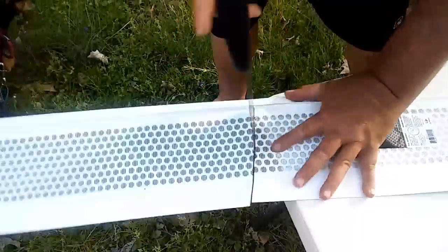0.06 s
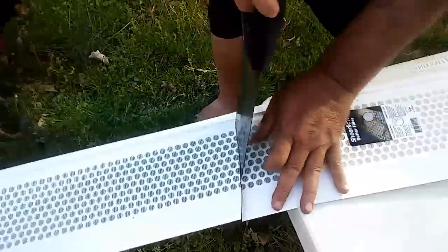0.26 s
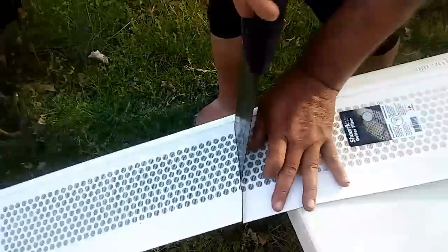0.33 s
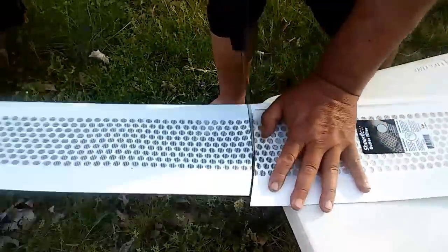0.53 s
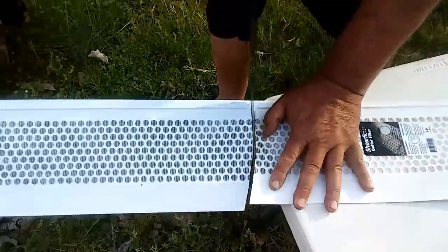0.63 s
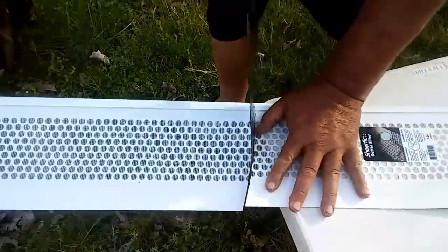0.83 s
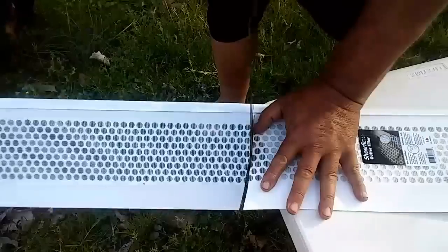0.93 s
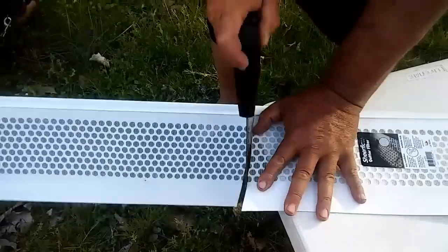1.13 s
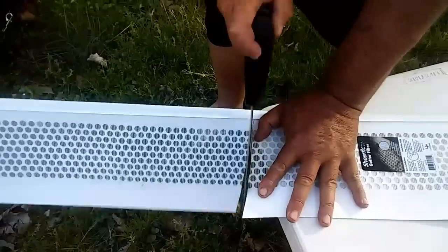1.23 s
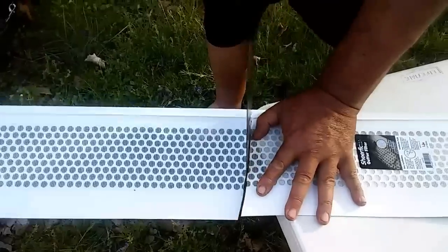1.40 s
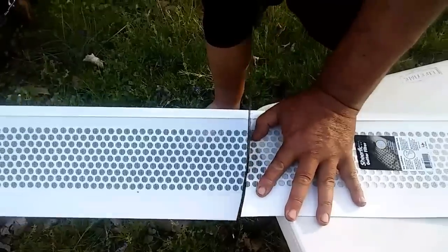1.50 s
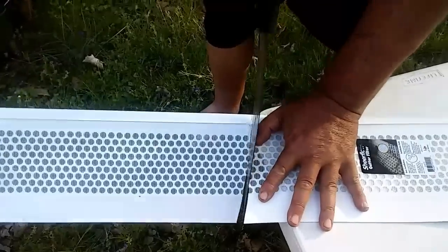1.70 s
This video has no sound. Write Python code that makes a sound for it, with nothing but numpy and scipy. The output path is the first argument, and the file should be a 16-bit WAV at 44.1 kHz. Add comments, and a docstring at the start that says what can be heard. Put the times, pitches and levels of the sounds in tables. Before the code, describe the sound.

A hand saw bites unevenly through a thin plastic panel, close up in faint outdoor air. The first push grows from near silence at 0.1 s, with low flutter, hollow clacks and a brief singing rub near 0.24. The pull from 0.55 to 1.0 cracks, thumps and squeals. The loudest push, 1.12 to 1.5, rumbles and slaps, then fades before a hollow knock near 1.68.

```python
"""A hand saw makes three strokes through a thin perforated plastic panel, in faint outdoor air.
From the start, uneven tooth bites drive a low flutter, a hollow clack and a bright blade rasp; the handle judders.
Teeth soon snap free as bursts of decaying noise over ringing steel; handle knocks and soft panel thumps join.
Then the blade rubs with a singing hiss, and short gliding tones give a scrape, a tear and later blade squeals.
A deep noise rumble is faint in the pull and swells in the hard last push, where the loose panel slaps
in noise bursts. The close microphone rounds the peaks."""
import sys
import numpy as np
from scipy import signal
from scipy.fft import rfft, irfft
from scipy.io import wavfile
from scipy.ndimage import uniform_filter1d

SR = 44100
rng = np.random.default_rng(int(sys.argv[2]) if len(sys.argv) > 2 else 0)


def dump_mix(stems):
    """Bounce the given channels to the path in sys.argv[1] as a 16-bit WAV at rate SR."""
    frames = np.atleast_2d(stems).T  # one column per channel
    limited = np.clip(frames, -1, 1)  # hard clip at full scale
    pcm = np.round(limited * 32767).astype(np.int16)
    wavfile.write(sys.argv[1], SR, pcm)


N = 77175  # length in samples


def undb(db):
    """Decibels to gain."""
    return 10 ** (np.asarray(db) / 20)


def unit(x):
    """Scale to rms 1."""
    return x / np.sqrt(np.mean(x ** 2) + 1e-18)


def curve(rows, axis):
    """One column of a table, joined by straight lines in time."""
    rows = np.array(rows, float)
    return np.interp(np.arange(N) / SR, rows[:, 0], rows[:, axis])


def colour(x, points):
    """Causal minimum-phase filter drawn through (f/Hz, level/dB) points."""
    size = 4096
    hz, db = np.array(points, float).T
    bins_hz = np.arange(size // 2 + 1) * SR / size
    gain_db = np.interp(np.log(bins_hz + 1), np.log(hz), db)
    # Folding the cepstrum forward in time puts the energy as early as possible.
    cepstrum = irfft(np.log(undb(gain_db)))
    cepstrum[1:size // 2] *= 2
    cepstrum[size // 2 + 1:] = 0
    impulse = irfft(np.exp(rfft(cepstrum)))
    return signal.fftconvolve(x, impulse)[:len(x)]


def walk(rate_hz):
    """Smooth random motion with spread 1: noise averaged twice over 1 / rate_hz."""
    span = max(int(SR / rate_hz), 1)
    noise = rng.standard_normal(N)
    return unit(uniform_filter1d(uniform_filter1d(noise, span), span))


def steady(x):
    """Even out slow changes of strength and keep the grain."""
    span = int(0.041 * SR)  # 41 ms
    power = uniform_filter1d(uniform_filter1d(x ** 2, span), span // 2)
    return x / np.sqrt(power + 1e-12)


def ring(points, t60_s):
    """A blow on a body with many close modes that die away together: coloured, decaying noise."""
    t = np.arange(SR // 4) / SR
    decay = np.exp(-np.log(1000) * t / t60_s)
    return colour(rng.choice([-1., 1.], len(t)) * decay, points)


def modes(table):
    """Separate modes after one blow: decaying sines with alternating signs."""
    t = np.arange(SR // 3) / SR
    tone = 0
    for k, (hz, db, t60_s) in enumerate(table):
        decay = np.exp(-np.log(1000) * t / t60_s)
        tone = tone + (-1) ** k * undb(db) * np.sin(2 * np.pi * hz * t) * decay
    return tone


ATTACK_S = 0.0024  # blow levels are the strongest rms over this stretch


def add(out, start_s, db, blow):
    """Place a blow with its attack at the given level."""
    i = int(start_s * SR)
    blow = blow / np.sqrt(uniform_filter1d(blow ** 2, int(ATTACK_S * SR)).max())
    out[i:i + len(blow)] += undb(db) * blow[:N - i]


def teeth(count):
    """Uneven bites, shared among several contact points, with fine scraping between them."""
    median_rate_hz, jitter = 560, 0.6  # jitter is the spread of the log gap
    scatter_db, deepest = 4, 1.53  # bite size spread, and its upper limit in spreads
    scrape_db = -10.5  # relative to the bites
    gap, size = rng.standard_normal((N // 40, 2)).T
    at = (np.cumsum(np.exp(jitter * gap)) * SR / median_rate_hz).astype(int)
    inside = at < N
    bite_gain = undb(scatter_db * np.minimum(size[inside], deepest))
    bites = np.bincount(at[inside], bite_gain, N)
    point = rng.integers(0, count, N)
    force = unit(bites) + undb(scrape_db) * rng.standard_normal(N)
    return [force * (point == k) for k in range(count)]


# Modes of the steel blade: (f/Hz, relative level/dB, t60/s)
BLADE_MODES = [(4100, 2, 0.038), (4360, -2, .1), (4620, -29, 0.12), (4585, -0.5, .15), (4850, -19, 0.093),
               (5120, 3.5, .1), (5540, 1, 0.11), (5550, 2, 0.099), (6170, -5.5, 0.13), (6370, -3, 0.061),
               (6960, -2.5, 0.093), (8550, -10, 0.075), (9200, -26, .08)]


def blade(force):
    """A force rings the steel blade's own modes, scaled to unit energy per unit kick."""
    tone = modes(BLADE_MODES)
    return signal.fftconvolve(force, tone / np.sqrt(np.sum(tone ** 2)))[:N]


# Strokes of the saw: (t/s, flutter level/dB, clack level/dB, rasp level/dB)
FIRST_PUSH = [(0, -45, -50.5, -62), (.095, -45, -74, -67), (0.126, -33, -42.5, -59),
              (0.204, -29, -31.5, -42), (.24, -32, -33.5, -70), (.305, -34.5, -56, -59),
              (0.344, -34, -37, -30.5), (.36, -33, -46.5, -46), (0.398, -26, -31.5, -38),
              (0.439, -43, -54, -41), (.535, -59, -59, -52)]
PULL = [(0.548, -36, -41, -46), (.58, -35, -24, -44), (.60, -26, -35, -50), (.615, -24.5, -29, -41),
        (.655, -24, -35, -49), (0.682, -27, -27.5, -25.5), (.718, -36, -27, -36), (.73, -28, -17, -23),
        (0.741, -22.5, -20.5, -24.5), (0.754, -26, -26.5, -28.5), (0.776, -29.5, -32, -25),
        (.787, -31.5, -22, -14), (.805, -31, -35, -44), (.845, -22.5, -23.5, -35.5), (.87, -26.5, -28, -31),
        (0.929, -29.5, -34, -52), (1.0, -42.5, -50.5, -58), (1.039, -47, -49, -48.5),
        (1.065, -31, -29.5, -42.5), (1.104, -45, -45.5, -85)]
HARD_PUSH = [(1.126, -27.5, -30, -36), (1.142, -20.5, -27.5, -50), (1.155, -20.5, -26, -42),
             (1.164, -19, -19.5, -20.5), (1.205, -18.5, -14, -22), (1.234, -17, -17.5, -13.5),
             (1.255, -18.5, -18, -24), (1.31, -15.5, -15.5, -20.5), (1.336, -21, -26, -44.5),
             (1.361, -21, -35, -39), (1.417, -29, -29, -32.5), (1.443, -19.5, -27.5, -28.5),
             (1.464, -23.5, -29, -40.5), (1.487, -29.5, -26, -22.5), (1.51, -32, -33, -39),
             (1.55, -32.5, -36, -42.5), (1.60, -42, -44.5, -55), (1.665, -58, -65, -87),
             (1.72, -42, -58, -71), (1.75, -56, -54, -62)]
# Spectra of panel flutter, panel clack and blade rasp: (f/Hz, relative level/dB)
FLUTTER = [(25, -52), (65, -30.5), (90, -39.5), (120, -12.5), (160, -2), (215, -0.5), (280, -2.5),
           (400, -5.5), (630, -9), (820, -14), (1000, -28.5), (2500, -58)]
CLACK = [(300, -28), (700, -19), (960, -9), (1150, -5), (1400, 0), (1650, -1), (2100, -3.5), (2550, -10),
         (3200, -14), (4200, -18.5), (8000, -60)]
RASP = [(1500, -67), (2600, -11.5), (3600, -12), (4500, 0.5), (5500, 0), (6600, -3.5), (7400, -13),
        (8800, -16), (11000, -23), (13000, -35), (16000, -52)]
# Bending modes, then higher hollow modes, of the panel: (f/Hz, relative level/dB, t60/s)
PANEL_MODES = [(106, -9.5, 0.47), (145, -3.5, 0.55), (182.3, 0.5, 0.16), (213.2, 2.5, 0.19),
               (295, -4.5, 0.073), (360, -5, 0.114), (413, -2, 0.11), (460, -2, 0.097), (642, -2.5, 0.13),
               (800, -9.5, 0.13)]
HOLLOW_MODES = [(1160, -3, 0.056), (1344, 3.5, 0.056), (1392, 1, 0.066), (1513, 5, 0.071),
                (1584, -1, 0.051), (1739, -2, 0.12), (1806, -9.5, 0.072), (2020, -5.5, 0.1),
                (2200, -1, .09)]


def sawing():
    """The bites shake panel and blade through three strokes; each contact point rings differently."""
    forces = teeth(count=6)
    strokes = [*FIRST_PUSH, *PULL, *HARD_PUSH]
    push = sum(forces) - np.mean(sum(forces))
    # spectrum, t60/s after one tooth, modes, level of the modes relative to the grain/dB
    bodies = [(FLUTTER, 0.046, PANEL_MODES, 1),
              (CLACK, 0.023, HOLLOW_MODES, -3),
              (RASP, 0.023, BLADE_MODES, -7)]
    out = 0
    for column, (spectrum, t60_s, table, ring_db) in enumerate(bodies, start=1):
        grain = steady(sum(signal.fftconvolve(force, ring(spectrum, t60_s))[:N] for force in forces))
        tone = steady(signal.fftconvolve(push, modes(table))[:N])
        body = steady(grain + undb(ring_db) * tone)
        out = out + body * undb(curve(strokes, axis=column))
    return out


# Spectrum of the outdoor air: (f/Hz, relative level/dB)
AIR = [(25, -33), (80, -28), (180, 7), (500, -22.5), (850, -17), (1500, -18), (6000, -28), (9000, -26),
       (16000, -55)]


def outdoor_air():
    """Faint, constant coloured noise."""
    return undb(-46.5) * unit(colour(rng.standard_normal(N), AIR))


def low_cut(x):
    """Thin out the handle and slap sounds below 80 Hz."""
    return signal.sosfilt(signal.butter(2, 80, "high", fs=SR, output="sos"), x)


# Strength of the handle judder: (t/s, level/dB)
JUDDER = [(0, -59), (.1, -50), (.13, -42.5), (.17, -34), (.21, -49), (.23, -79)]
# Spectrum of the judder: (f/Hz, relative level/dB)
JUDDER_COLOUR = [(300, -28), (480, 2), (750, -25), (1100, -17), (1450, 11), (1900, -9), (2600, -14),
                 (3000, -1), (3400, 0), (4000, -26), (8000, -12), (16000, -61)]


def judder():
    """The handle judders as the first push gets going: coloured tooth bites."""
    grain = steady(colour(sum(teeth(count=1)), JUDDER_COLOUR))
    return low_cut(grain * undb(curve(JUDDER, axis=1)))


# Teeth snapping free: (t/s, flutter level/dB, clack level/dB, rasp level/dB)
SNAPS = [(.041, -44, -48, -69), (0.103, -34, -52, -60), (0.1145, -28, -37, -34.5),
         (0.2266, -32.5, -36, -30), (.279, -29, -32.5, -31), (0.3656, -42, -15.5, -18),
         (0.5544, -36, -24, -37), (0.564, -14, -9.5, -10.5), (.5695, -17.5, -10.5, -47),
         (.5745, -40, -32, -43), (.605, -22, -21, -30), (.621, -21, -6.5, -12), (0.627, -32, -34, -46),
         (0.654, -42, -37, -30), (0.6688, -31, -19, -17), (0.701, -21.5, -15, -20.5),
         (.7213, -38, -14.5, -24.5), (0.8107, -19, -8, -15), (0.8603, -25, -19, -38),
         (.8897, -38, -15.5, -11), (0.8965, -32, -10, -11), (.901, -22.5, -25, -20), (.956, -33, -37, -45),
         (1.0184, -39, -48, -36.5), (1.159, -13, -13, -21), (1.188, -10.5, -22, -13.5),
         (1.195, -14, -18, -27), (1.2648, -9.5, -39, -12), (1.294, -13, -34, -22), (1.3389, -42, -26, -23),
         (1.4331, -22.5, -25, -36), (1.4934, -35, -19.5, -27), (1.6138, -39.5, -43, -40.5),
         (1.6365, -52, -41, -43)]
# Spectra of the panel's flutter and clack in a snap: (f/Hz, relative level/dB)
SNAP_FLUTTER = [(25, -36), (70, -27), (120, -8.5), (195, 2.5), (330, 0), (500, -3), (700, -9.5),
                (1000, -18), (2500, -62.5)]
SNAP_CLACK = [(300, -29), (700, -7), (950, -8.5), (1380, 1), (1680, -1.5), (2100, -3), (2600, -7.5),
              (3300, -8), (4200, -15), (8000, -55.5)]


def snaps():
    """A tooth caught on a hole lets go: the panel cracks and the blade rings on."""
    out, kicks = np.zeros(N), np.zeros(N)
    bodies = [(SNAP_FLUTTER, 0.12), (SNAP_CLACK, 0.058), (RASP, 0.034)]  # spectrum, t60/s
    for start_s, *levels in SNAPS:
        for db, body in zip(levels, bodies):
            add(out, start_s, db, ring(*body))
        # The rasp level also sets the kick to the blade.
        kicks[int(start_s * SR)] = undb(levels[-1]) * np.sqrt(ATTACK_S * SR)
    return out + undb(-12.5) * blade(kicks)


# Hollow knocks of the saw handle: (t/s, level/dB)
KNOCKS = [(.125, -27.5), (0.3158, -22.5), (0.9741, -28.5), (1.6847, -22)]
# Modes of a knock: (f/Hz, relative level/dB, t60/s)
KNOCK_MODES = [(138, -4.5, 0.12), (212, -6, .1), (351, -1.5, 0.075), (472, 2.5, 0.096), (545, -0.5, 0.058),
               (760, -12.5, 0.067), (1404, -6.5, 0.049), (1780, -12, 0.023), (3020, -5.5, 0.048),
               (3570, -8, 0.037)]
# Spectrum of the crack in a knock: (f/Hz, relative level/dB)
KNOCK_CRACK = [(60, -26), (200, -6), (600, 1.5), (1000, -9.5), (1800, -9.5), (2400, -14.5), (2900, -1),
               (3600, -14), (4300, -41), (9000, -31), (16000, -56)]


def knocks():
    """The handle knocks: hollow modes with a short noisy crack on top."""
    out = np.zeros(N)
    for start_s, db in KNOCKS:
        add(out, start_s, db, modes(KNOCK_MODES))
        add(out, start_s, db - 3, ring(KNOCK_CRACK, t60_s=0.046))
    return low_cut(out)


# Soft thumps: (t/s, level/dB)
THUMPS = [(.131, -27.5), (.237, -20), (.609, -14), (.748, -18), (.781, -17), (0.865, -23), (1.538, -31)]
# Spectrum of a thump: (f/Hz, relative level/dB)
THUMP = [(25, -26), (90, -19), (140, -1), (220, 2), (310, -0.5), (420, -6.5), (600, -25), (1200, -48.5)]


def thumps():
    """The flexing panel bumps its support: soft, low bursts of decaying noise."""
    out = np.zeros(N)
    for start_s, db in THUMPS:
        add(out, start_s, db, ring(THUMP, t60_s=0.088))
    return out


# Strength of the rub: (t/s, level/dB)
RUB = [(.218, -97), (.228, -26.5), (.24, -21.5), (.252, -28), (.275, -32.5), (.305, -63.5)]
# Spectrum of the rub's hiss: (f/Hz, relative level/dB)
RUB_HISS = [(1000, -30), (2000, -8), (3100, -4), (3900, -7), (5300, -1.5), (7500, -5), (10000, -10.5),
            (13000, -24.5), (16000, -24)]


def rub():
    """Friction on the flat of the blade in the cut makes its modes sing over a hiss."""
    friction = sum(teeth(count=1))
    singing = steady(blade(friction))
    hiss = steady(colour(friction, RUB_HISS))
    return steady(singing + undb(-0.5) * hiss) * undb(curve(RUB, axis=1))


# Short gliding tones: a blade scrape, a rising tear of the panel, blade squeals; one table per tone:
# (t/s, f/Hz before wobble, level/dB before blade ring)
GLIDING_TONES = [
    [(.224, 5366, -40), (.229, 5300, -27), (.242, 5150, -22), (.254, 4800, -48)],
    [(.566, 3400, -14.5), (.571, 3730, -10.5), (.578, 4130, -31), (.585, 4400, -51)],
    [(.752, 4636, -42), (.758, 4550, -20), (.764, 4540, -14), (.777, 5000, -20), (.785, 4780, -16),
     (.794, 4550, -18), (.806, 4400, -35)],
    [(1.469, 6200, -39), (1.475, 6000, -29), (1.492, 5330, -39), (1.503, 4400, -34), (1.512, 4250, -44)],
]


def gliding_tone(rows):
    """A short, rough tone whose pitch glides and wobbles; it wakes the blade's modes."""
    wobble = 1 + 0.045 * walk(rate_hz=900)
    phase = 2 * np.pi * np.cumsum(curve(rows, axis=1) * wobble) / SR
    tone = np.sin(phase) + undb(-23) * np.sin(2 * phase)  # with a faint octave
    roughness = undb(1.5 * walk(rate_hz=1100))  # 1.5 dB spread
    t = np.arange(N) / SR
    sounding = (t > rows[0][0]) * (t < rows[-1][0])
    glide = steady(tone * roughness) * undb(curve(rows, axis=2)) * sounding
    return glide + undb(-19) * blade(glide)


# Strength of the deep rumble: (t/s, level/dB)
RUMBLE = [(.55, -62), (.57, -29.5), (.66, -39), (.70, -63), (1.10, -69), (1.125, -33.5), (1.16, -14),
          (1.25, -18), (1.32, -21.5), (1.38, -28.5), (1.46, -55), (1.6, -80)]
# Spectrum of the rumble: (f/Hz, relative level/dB)
RUMBLE_COLOUR = [(25, -25), (50, -18), (70, -14), (108, 0), (150, 4.5), (190, 2.5), (260, -17.5), (380, -6),
                 (500, -14), (630, -8), (830, -8.5), (1100, -30), (2500, -73)]


def rumble():
    """The whole panel heaves under load: deep coloured noise."""
    noise = steady(colour(rng.standard_normal(N), RUMBLE_COLOUR))
    return noise * undb(curve(RUMBLE, axis=1))


# Slaps of the loose half of the panel: (t/s, level/dB)
SLAPS = [(1.1167, -18), (1.1435, -9.5), (1.2165, -10.5), (1.2465, -16)]
# Spectrum of a slap: (f/Hz, relative level/dB)
SLAP = [(500, -32), (1000, -9), (1400, 2.5), (1800, -2.5), (2150, 0.5), (2700, -27), (5000, -21.5),
        (9000, -34), (16000, -60)]


def slaps():
    """The loose half of the panel slaps against the blade: bursts of decaying noise."""
    out = np.zeros(N)
    for start_s, db in SLAPS:
        add(out, start_s, db, ring(SLAP, t60_s=0.044))
    return low_cut(out)


def scene():
    """The saw over faint outdoor air."""
    mix = sawing() + outdoor_air() + judder() + snaps() + knocks() + thumps() + rub()
    mix = mix + sum(gliding_tone(rows) for rows in GLIDING_TONES) + rumble() + slaps()
    return mix[None]


def record(dry):
    """The microphone rounds the highest peaks and cuts the top above 16 kHz."""
    ceiling = 1  # full scale
    rounded = dry / (1 + (dry / ceiling) ** 6) ** (1 / 6)
    return signal.sosfilt(signal.ellip(8, .2, 70, 16000, fs=SR, output="sos"), rounded)


dry = scene()
out = record(dry)
dump_mix(out)
```